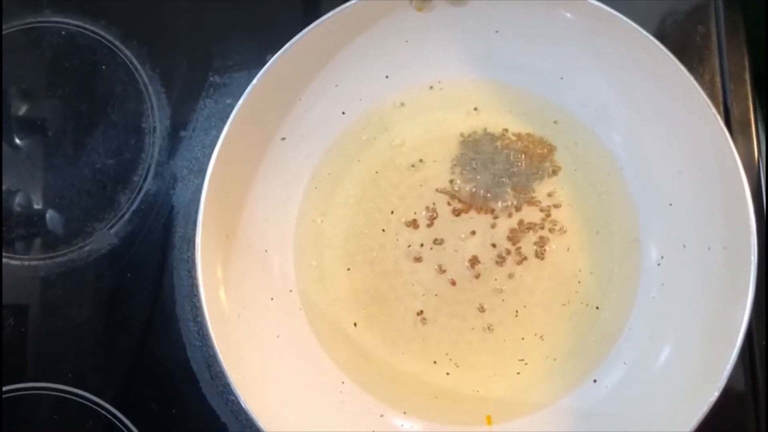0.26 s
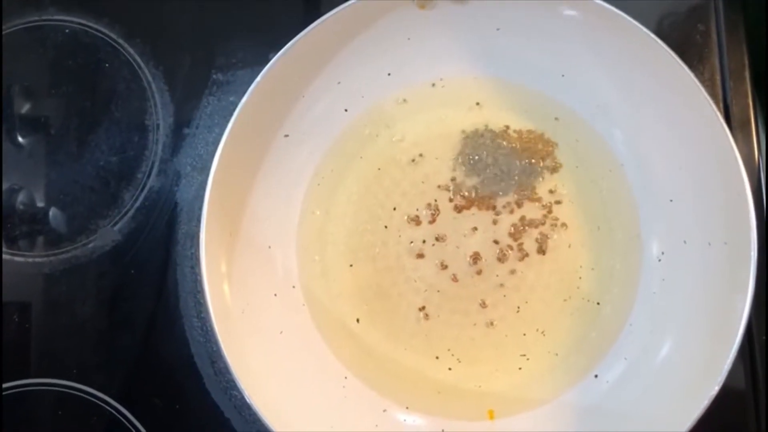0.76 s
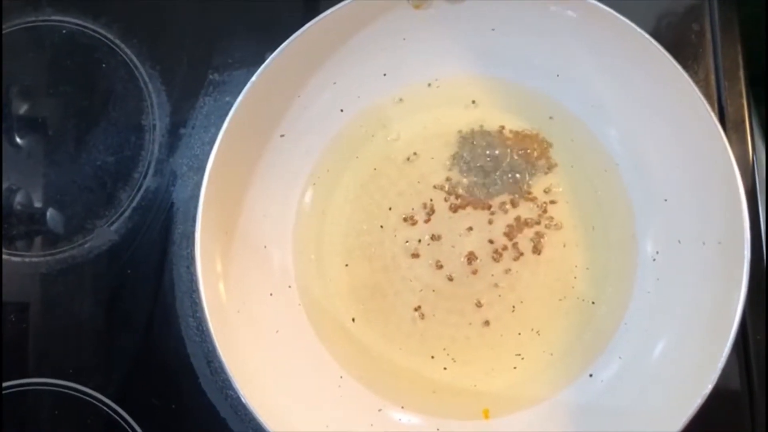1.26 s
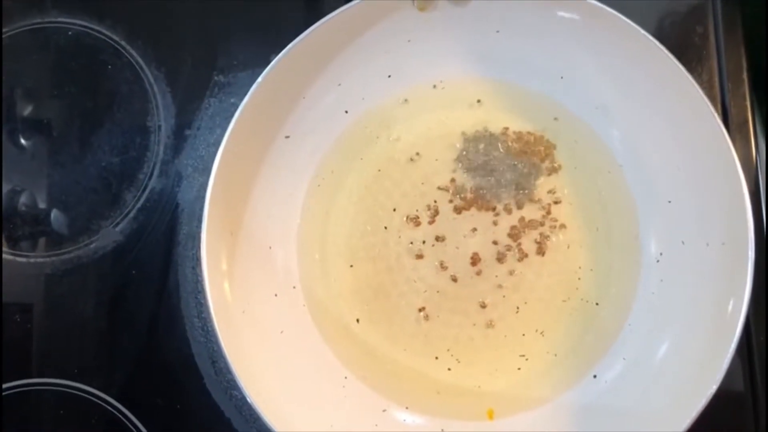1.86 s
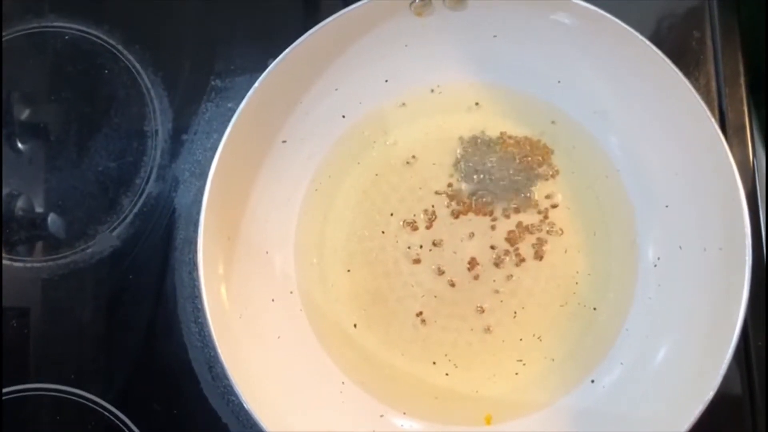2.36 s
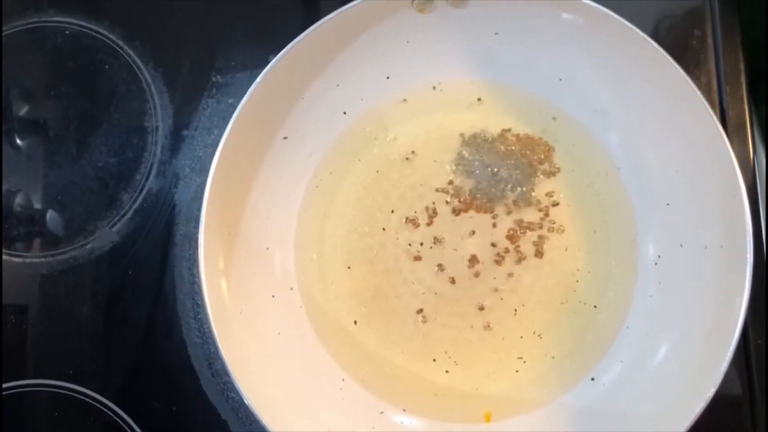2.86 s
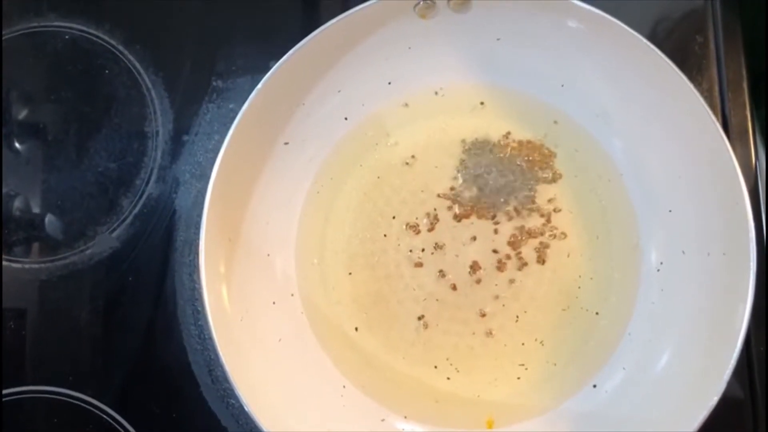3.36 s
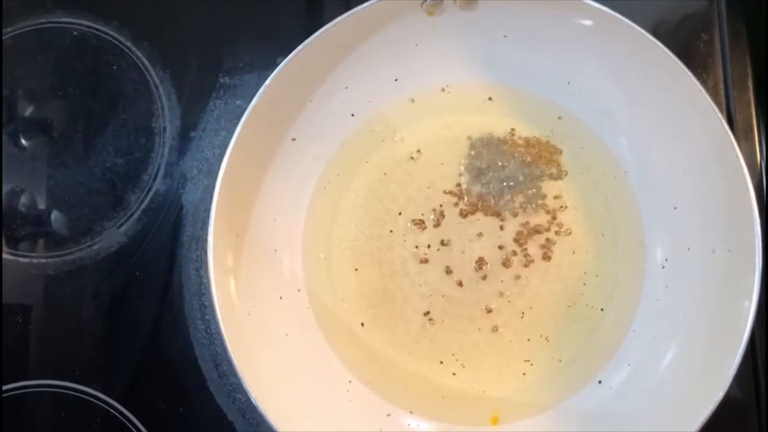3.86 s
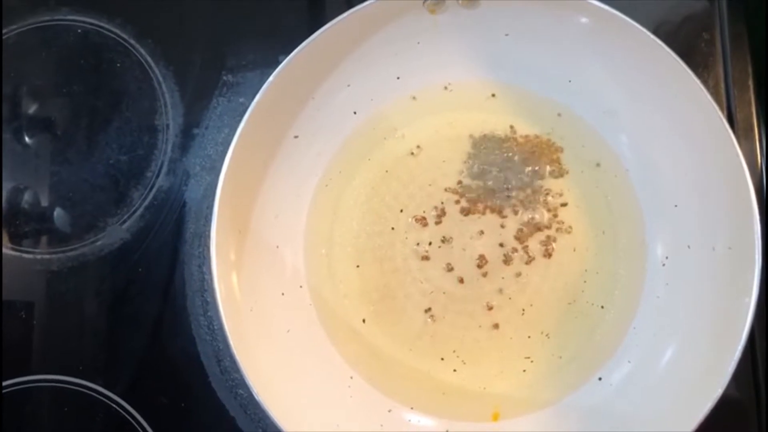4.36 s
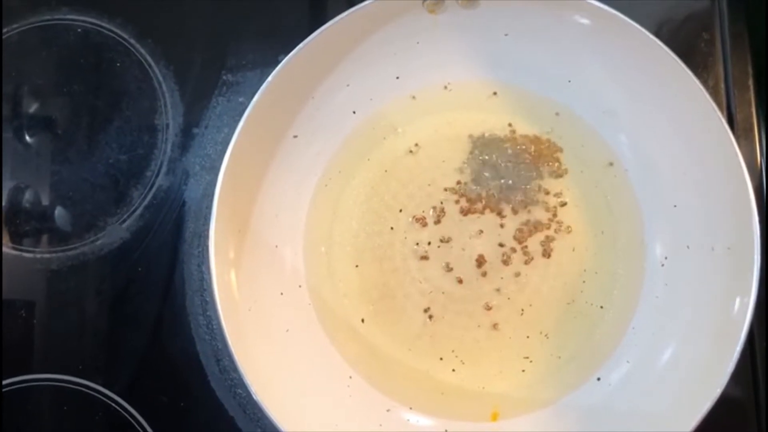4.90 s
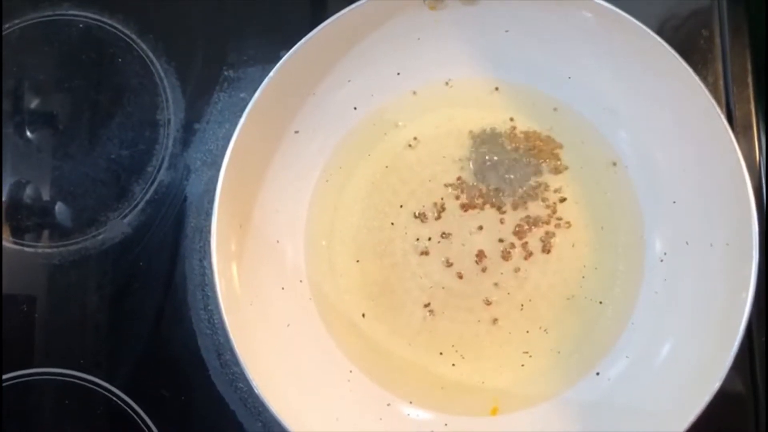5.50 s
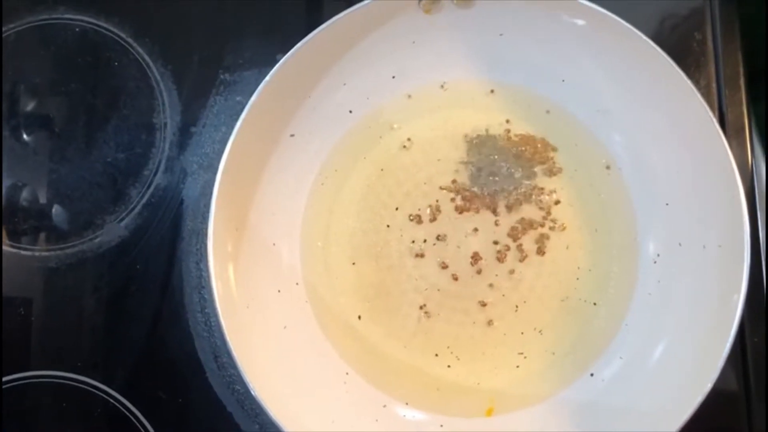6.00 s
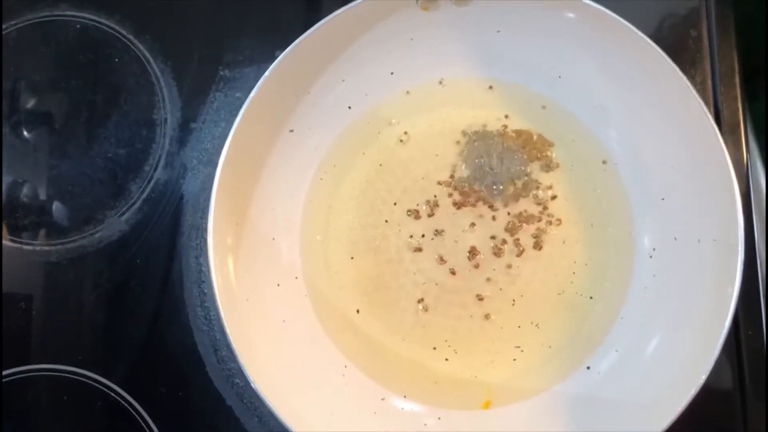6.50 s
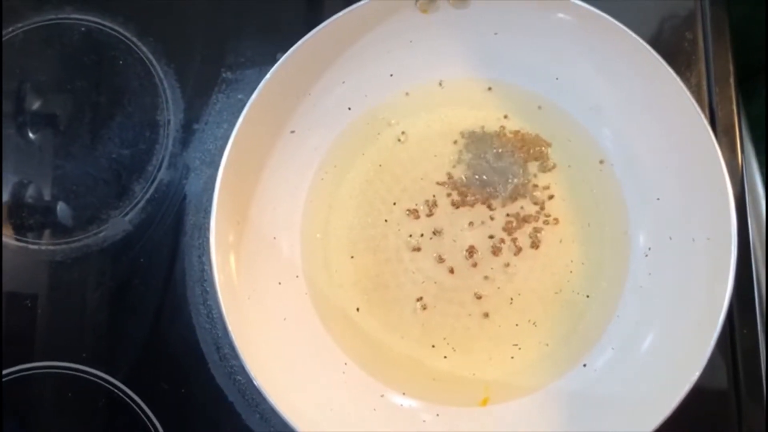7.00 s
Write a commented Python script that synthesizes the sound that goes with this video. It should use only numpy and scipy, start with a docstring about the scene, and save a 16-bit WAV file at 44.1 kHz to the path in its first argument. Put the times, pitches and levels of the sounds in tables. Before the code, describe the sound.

From 0 seconds a thin, bright sizzle of hot oil runs continuously, quiet and slightly fluttering, over a very faint low stove hum, fan and room noise. A pop with a light pan knock comes near 0.2, then smaller ones, with sharper cracks at 0.9, 1.4 and 1.75. Pops keep coming irregularly, one strong at 2.4 with a faint steam hiss, followed by a run of small ticks to 2.9. From 3.1 they grow louder and crowd together; a hard snap at 3.9 trails steam, and strong cracks cluster from 4.1 to 4.6, one with a lower pan-like rush. Around 4.9 to 5.6 only weaker, spaced ticks remain. Louder pops return at 5.7 to 5.9, the last with a fading hiss. After a gap, the loudest crack hits at 6.4, then several more until 6.9. Soft hand bumps at 1.9, 3.6 and 7.0 are barely audible. Everything is close and dry, with short kitchen reflections.

```python
"""Small seeds fry in shallow hot oil in a kitchen, close to a phone microphone.
From the start, damped sines of bubbles and shaped noise make a dense fizz over hob hum, fan tones and room noise.
From 0.2 s to 6.9 s seeds pop: a collapsing cavity rings, noise snaps, the pan knocks, echoes and a room tail follow.
After some pops, from 0.2 s to 6.4 s, rough decaying noise hisses as steam or rushes lower with a pan-like ring.
Soft low bumps of the hand, a few damped cycles each, come at 1.9, 3.6 and 7.0 s."""
import sys
import numpy as np
from scipy import signal
from scipy.fft import rfft, irfft, next_fast_len
from scipy.io import wavfile
from scipy.ndimage import uniform_filter1d, minimum_filter1d, map_coordinates

SR = 44100
rng = np.random.default_rng(int(sys.argv[2]) if len(sys.argv) > 2 else 0)


def to_linear_factor(level_db):
    """Convert decibel levels (scalar or array-like) to linear amplitude factors."""
    exponent = np.asarray(level_db, float) / 20
    return 10 ** exponent


def int16_out(signal):
    """Quantize to a 16-bit WAV file."""
    q = np.round(np.clip(np.atleast_2d(signal).T, -1, 1) * 32767)
    wavfile.write(sys.argv[1], SR, q.astype(np.int16))


N = 319712  # length in samples


def unit(x):
    """Normalisation: the signal divided by its root mean square."""
    return x / np.sqrt(np.mean(x ** 2) + 1e-20)


def along(points, hz):
    """Interpolation on a logarithmic frequency axis between (f/Hz, value) points."""
    f, value = np.transpose(points)
    return np.interp(np.log(hz + 1), np.log(f + 1), value)


def coloured(x, spectrum):
    """Linear filtering: the spectrum of x times a (f/Hz, level/dB) response, scaled to rms 1."""
    size = next_fast_len(len(x) + SR // 10)
    response = to_linear_factor(along(spectrum, np.fft.rfftfreq(size, 1 / SR)))
    return unit(irfft(rfft(x, size) * response, size)[:len(x)])


def wobble(rate):
    """Band-limited fluctuation: a spline through random knots, rate of them a second."""
    knots = rng.standard_normal(int(N * rate / SR) + 4)
    return map_coordinates(knots, [np.arange(N) * rate / SR])


def add(track, s, sound):
    """Superposition: the sound is summed into the track from second s."""
    part = track[round(s * SR):][:len(sound)]
    part += sound[:len(part)]


def bubbles(per_s, cycles, spread_db, centre_hz, octaves):
    """Shot noise: damped sines at random moments, their levels in dB exponentially distributed."""
    draw = rng.random((round(per_s * N / SR), 3))
    moment, place, chance = draw[:, :1], draw[:, 1:2], draw[:, 2:]
    pitch = np.clip(centre_hz * 2 ** (octaves * (2 * place - 1)), 1, SR / 2)
    sample = np.arange(96)
    turns = pitch * sample / SR
    size = to_linear_factor(-spread_db * np.log(1 - chance))  # a few are much larger than the rest
    grains = size * np.exp(-turns / cycles) * np.sin(2 * np.pi * turns)
    at = (moment * N).astype(int) + sample
    return unit(np.bincount(at.ravel(), grains.ravel(), N + 96)[:N])


def patchy(x, depth_db):
    """Random modulation: small regions of time and pitch swell and fade on their own."""
    z = signal.stft(x, nperseg=256)[2]
    field = uniform_filter1d(rng.standard_normal(z.shape), size=4, axis=0)  # over frequency
    field = uniform_filter1d(field, size=9, axis=1)  # over time
    return unit(signal.istft(z * to_linear_factor(depth_db * unit(field)), nperseg=256)[1][:len(x)])


def sizzle():
    """Dense bubble bursts: impulsive near ones merge with the Gaussian hiss of many far ones."""
    # fizz of the oil: t/s, level/dB before flutter
    levels = [(0.0, -42.5), (0.99, -41), (2.2, -42), (2.48, -40), (3.29, -42), (4.078, -40.5), (4.44, -43),
              (5.23, -40), (5.43, -42.5), (6.9, -42), (7.25, -43.5)]
    # spectral density of bursting bubbles: f/Hz, relative level/dB per Hz
    fizz_spectrum = [(2400, -51), (3300, -23.5), (3800, -21.5), (4000, -7.5), (4250, -17), (4800, -9),
                     (5550, -5), (5800, -4), (6400, 0), (7050, -7), (8000, -3.5), (9400, -10.5),
                     (11550, -21.5), (11800, -44)]
    s, level_db = np.transpose(levels)
    near = bubbles(per_s=3000, cycles=6.5, spread_db=2, centre_hz=6500, octaves=0.837)
    spectrum = rfft(near)
    smooth_power = uniform_filter1d(np.abs(spectrum) ** 2, size=2000)
    whitened = irfft(spectrum / np.sqrt(smooth_power), N)
    far = rng.standard_normal(N)
    fizz = coloured(0.4 * unit(whitened) + 1.2 * far, fizz_spectrum)
    # the boiling flutters, slowly and fast
    flutter_db = 1.0 * wobble(3.995) + 0.84 * wobble(7.8) + 0.61 * wobble(60)
    gain = to_linear_factor(np.interp(np.arange(N) / SR, s, level_db) + flutter_db)
    return gain * patchy(fizz, depth_db=2.0)


def puff(t, spectrum, t60):
    """Exponential decay of coloured noise; its energy is set by its envelope, not by chance."""
    shape = to_linear_factor(-60 * t / t60)
    burst = shape * coloured(rng.standard_normal(len(t)), spectrum)
    return burst * np.linalg.norm(shape) / np.linalg.norm(burst)


def tail(t):
    """Diffuse reverberation: fresh noise of energy 1, each frequency decaying at its own rate."""
    # kitchen reverberation: f/Hz, t60/s
    room_decay = [(500, 0.18), (2000, 0.42), (5000, 0.16), (11000, 0.092)]
    hz, frames, z = signal.stft(rng.standard_normal(len(t)), SR, nperseg=128)
    decay = to_linear_factor(-60 * frames / along(room_decay, hz)[:, None])
    answer = signal.istft(z * decay, SR, nperseg=128)[1][:len(t)]
    answer = answer * (t > .006)  # silent for the first 6 ms
    return answer / np.linalg.norm(answer)


def wall_echoes():
    """Specular reflection: the direct sound, then delayed copies of random sign."""
    # echoes from the pan wall and the hob, before random spread: delay/s, level/dB
    echoes = [(.0017, -11), (.0026, -20.5), (.0037, -14.5), (.0048, -29), (.0058, -24), (.0075, -29)]
    wall = np.zeros(SR // 50)
    wall[0] = 1
    for delay, echo_db in echoes:
        at = round(delay * rng.uniform(.85, 1.15) * SR)  # every seed lies at another spot
        wall[at] = to_linear_factor(echo_db + rng.normal(0, 2)) * rng.choice([-1, 1])
    return wall


def pan_knock(t):
    """Modal excitation: damped pan modes and a noisy thud rise together after the impact."""
    # low modes of the pan, before random spread: f/Hz, level/dB, t60/s
    pan_modes = [(663, -18, 0.0056), (846, -13.5, 0.012), (1175, -14, 0.021), (1446, -6.5, 0.0063),
                 (1620, -1, 0.019), (1890, 2.5, 0.017), (2013, -8.5, 0.02), (2498, -14, 0.023),
                 (2785, -14, 0.031), (3060, -12, 0.016)]
    # dull thud of the oil on the pan floor: f/Hz, relative level/dB per Hz
    thud_spectrum = [(350, -56), (600, -17.5), (900, -3.5), (1700, -2), (2200, -1.5), (3300, -9),
                     (5000, -0.5), (20000, -71)]
    rise_s, thud_t60_s, thud_db = 0.00098, 0.037, -6.5
    modes = np.zeros(len(t))
    for hz, level_db, t60 in pan_modes:
        modes += to_linear_factor(level_db + rng.normal(0, 0.99) - 60 * t / t60) * np.sin(2 * np.pi * hz * t)
    thud = to_linear_factor(thud_db) * puff(t, thud_spectrum, thud_t60_s)
    return (1 - np.exp(-t / rise_s)) * (modes + thud)


def pops():
    """Cavity collapse: a short ring and a broad snap, the pan's knock, echoes and the room."""
    # seeds bursting: t/s, nominal level/dB, cavity f/Hz,
    # pan knock/dB and snap/dB, both relative to the nominal level
    bursts = [(0.178, -12, 6280, -6, 10), (0.3094, -36, 6350, -3, 9.5), (0.479, -32, 7360, -5, 9),
              (0.7808, -16, 5930, -3.5, 8), (0.829, -21, 8640, -31, -16), (0.8739, -7.5, 6700, -23, -1.5),
              (1.0, -10.5, 5530, -5.5, 5.5), (1.2219, -23, 4070, -9, 5), (1.3598, -17, 4940, -14.5, -12),
              (1.433, -4, 4130, -18, -10.5), (1.483, -23, 5760, -39, -2), (1.5725, -19, 6050, -10.5, -4),
              (1.6606, -30, 5300, -16, 11), (1.7494, -3.5, 5000, -11.5, -5), (1.9594, -29.5, 6900, -18, 7),
              (1.9772, -13.5, 5230, -17.5, -5), (2.1987, -15, 4780, -2.5, 7), (2.335, -21.5, 5020, -7.5, 3),
              (2.4069, -6, 5100, -14, 5.5), (2.4456, -25.5, 4530, -12, -4), (2.455, -20, 4400, -17.5, -16),
              (2.5539, -24, 4060, -10, 4), (2.5698, -18, 7430, -13.5, 3), (2.652, -26, 5400, -13, -3),
              (2.6973, -28.5, 4830, -6, 2), (2.7441, -29, 6230, -27, 5), (2.9282, -29, 5860, -17.5, -15),
              (3.1478, -11.5, 6900, -9, -0.5), (3.181, -18.5, 6370, -29.5, -3),
              (3.2471, -7.5, 7520, -18, -3), (3.5063, -12.5, 5850, -6.5, -1), (3.564, -18, 5400, -16, -6),
              (3.6443, -5.5, 6880, -19.5, 3), (3.6942, -20.5, 4780, -22, -7),
              (3.7956, -18, 5900, -2.5, 9.5), (3.8776, -18.5, 5140, -12, 5), (3.8882, 0.5, 6570, -43, -9),
              (3.8995, -24, 6450, -31, -1), (4.0352, -11, 5440, -10, 0.5), (4.106, -4.5, 4730, -14.5, -3.5),
              (4.158, -15, 4850, -20.5, 0), (4.2039, -8, 5070, -5.5, 6.5), (4.2667, -0.5, 4010, -20, -5.5),
              (4.4182, -10.5, 7080, -17, 8), (4.625, -3, 5400, -36, -5), (4.907, -19, 4720, -18.5, 3),
              (5.0691, -20, 6570, -16.5, -7.5), (5.1879, -34.5, 6300, -7.5, 10.5),
              (5.23, -21.5, 5760, -5, 1.5), (5.34, -20.5, 4700, -6.5, 8.5), (5.424, -20, 6500, -32, 3),
              (5.7047, -11, 5550, -17, -7), (5.7793, -7.5, 5050, -18.5, -9.5),
              (5.822, -31.5, 4160, -28, -11), (5.8705, -4, 4710, -29.5, 0), (6.4155, -14.5, 7170, -20, -12),
              (6.4294, 3.5, 5920, -26, -11), (6.6432, -3.5, 4750, -21.5, -2), (6.7408, -6.5, 3870, -17, -3),
              (6.8307, -24, 3920, -4, 15), (6.935, -16.5, 5100, -15.5, 4.5)]
    # broad snap of a burst: f/Hz, relative level/dB per Hz
    snap_spectrum = [(400, -73), (800, -15), (2500, -14), (4000, 3), (6500, 5.5), (9500, -3.5),
                     (11500, -15.5), (12500, -49), (20000, -60)]
    rise_s, snap_t60_s = 0.00039, 0.0053
    room_db = -17  # relative to the near sound
    # a cavity lives longer the larger (lower) it is; a violent burst tears it sooner
    cavity_s, cavity_hz = 0.0011, 5000  # life of a 0 dB burst at that pitch
    longer_when_low, torn_per_db = 0.73, 0.0326  # exponents of the two effects

    out, t = np.zeros(N), np.arange(SR // 3) / SR
    rise = 1 - np.exp(-(t / rise_s) ** 2)
    for s, db, hz, knock_db, snap_db in bursts:
        life = cavity_s * (cavity_hz / hz) ** longer_when_low * np.exp(-torn_per_db * db)
        # holds a few cycles, then collapses
        cavity = np.exp(-(t / life) ** 2.5) * np.sin(2 * np.pi * hz * t)
        snap = to_linear_factor(snap_db) * puff(t, snap_spectrum, snap_t60_s)
        echoed = signal.fftconvolve(rise * (cavity + snap), wall_echoes())[:len(t)]
        near = echoed + to_linear_factor(knock_db) * pan_knock(t)
        room = signal.fftconvolve(near, tail(t))[:len(t)]
        add(out, s, to_linear_factor(db) * (near + to_linear_factor(room_db) * room))
    return out


def pop_rushes():
    """Decaying band noise with a random envelope: a steam hiss, or a lower, pan-like ringing rush."""
    # decaying noise after a pop, hissing steam near 5-6.5 kHz or a lower, pan-like ringing rush
    # near 2.7 kHz: t/s, starting level/dB before roughness, centre f/Hz, t60/s
    rushes = [(1.981, -39, 5500, 0.15), (2.411, -38, 5500, 0.44), (2.555, -31.5, 5930, 0.072),
              (3.899, -29.5, 6300, 0.44), (0.181, -38, 2680, 0.15), (2.202, -41, 2660, 0.15),
              (4.111, -30, 2750, 0.17), (4.158, -37, 5400, 0.25), (4.427, -42.5, 2580, 0.26),
              (5.874, -35.5, 4950, 0.51), (6.417, -33, 6500, 0.03)]
    out, t = np.zeros(N), np.arange(SR // 2) / SR
    roughness = to_linear_factor(1.9 * wobble(250))
    for s, db, hz, t60 in rushes:
        band = [(hz * 0.31, -32), (hz * 0.82, -6), (hz, 0), (hz * 1.25, -7), (hz * 2.1, -40)]
        noise = coloured(rng.standard_normal(len(t)), band)
        add(out, s, to_linear_factor(db - 60 * t / t60) * noise)
    return out * roughness


def handling():
    """Damped oscillation: each bump of the hand holding the phone is a few soft low cycles."""
    # soft bumps: t/s, level/dB, f/Hz
    bumps = [(1.88, -59, 80), (3.602, -67, 307), (6.97, -60, 69.5)]
    out, t = np.zeros(N), np.arange(SR // 10) / SR
    for s, db, hz in bumps:
        envelope = (t / 0.014) * np.exp(1 - t / 0.016)
        add(out, s, to_linear_factor(db) * envelope * np.sin(2 * np.pi * hz * t))
    return out


def hob_hum(t):
    """Additive synthesis: partials of the hob, wavering slightly in level and phase."""
    # hum of the hob, before wavering: f/Hz, rms level/dB
    partials = [(118.4, -61.5), (148, -76), (199, -82), (240, -90), (296, -79)]
    hum = np.zeros(N)
    for hz, db in partials:
        hum += to_linear_factor(db + 0.71 * wobble(8)) * np.sin(2 * np.pi * hz * t + .15 * wobble(7.4))
    return np.sqrt(2) * hum  # peak of a sine over its rms


def hob_fan(t):
    """Harmonic series: orders of one turning rate share its phase drift but waver in level alone."""
    # cooling fan of the hob, before wavering: order of the turning rate: rms level/dB
    orders = {1: -79, 2: -80.5, 3: -71, 4: -76.5, 5: -81.5, 6: -73, 8: -86.5}
    fan_hz = 44.5
    turn = 2 * np.pi * fan_hz * t + 0.11 * wobble(2.74)
    fan = np.zeros(N)
    for order, db in orders.items():
        phase = rng.uniform(0, 2 * np.pi)
        fan += to_linear_factor(db + 2.4 * wobble(2.8)) * np.sin(order * turn + phase)
    return np.sqrt(2) * fan


def kitchen():
    """Background superposition: filtered room noise under the tones of the hob and its fan."""
    # kitchen background: f/Hz, relative level/dB per Hz
    room_spectrum = [(25, -44), (40, 0.5), (110, -2), (300, -1), (420, -8), (600, -6), (1300, -11),
                     (1600, -10), (1950, -8.5), (2300, -18), (3000, -12), (3900, -39), (6600, -120)]
    noise_db = -63  # rms
    t = np.arange(N) / SR
    noise = to_linear_factor(noise_db) * coloured(rng.standard_normal(N), room_spectrum)
    return hob_hum(t) + hob_fan(t) + noise


def scene():
    """Linear superposition: all sources add at one microphone."""
    return (sizzle() + pops() + pop_rushes() + handling() + kitchen())[None]


def top_cut(x):
    """Nothing passes above the cut-off."""
    return signal.sosfilt(signal.butter(12, 12710, fs=SR, output="sos"), x)


def record(dry):
    """Band limiting and peak limiting: little stays above 12 kHz, and the loudest pops are held down."""
    # the phone's pass band: f/Hz, gain/dB
    pass_band = [(20, -20), (40, 0), (12000, 0), (12600, -30), (16000, -45)]
    heard = irfft(rfft(dry) * to_linear_factor(along(pass_band, np.fft.rfftfreq(N, 1 / SR))), N)
    needed = np.minimum(1, .88 / (np.abs(heard) + 1e-9))  # ceiling 0.88 of full scale
    # the gain dips just ahead of a peak; windows in samples
    gain = uniform_filter1d(minimum_filter1d(needed, size=25), size=23)
    return top_cut(heard * gain)


dry = scene()
out = record(dry)
int16_out(out)
```